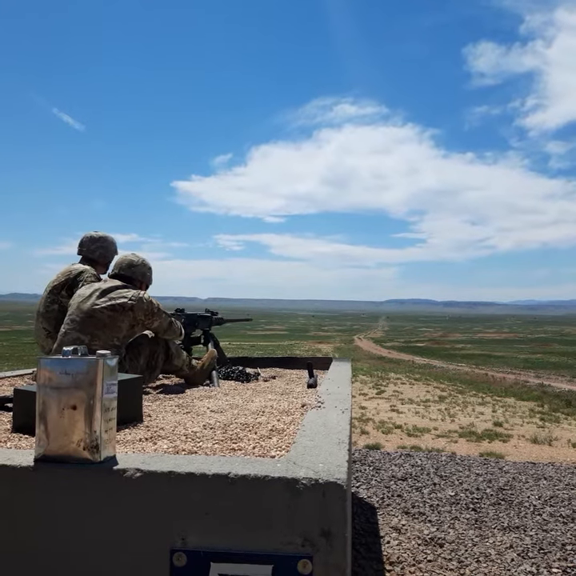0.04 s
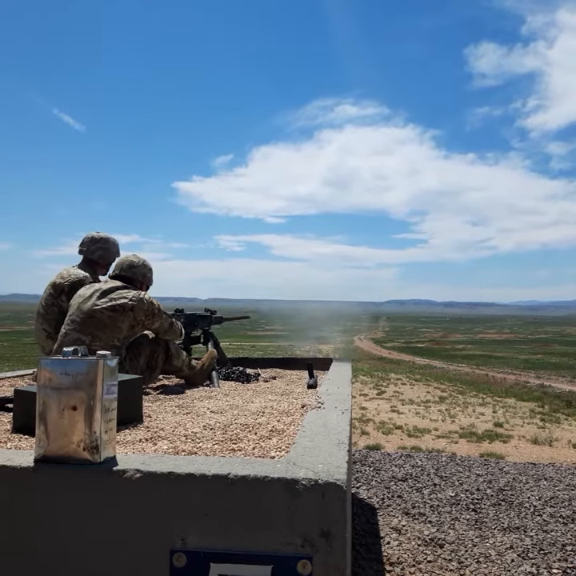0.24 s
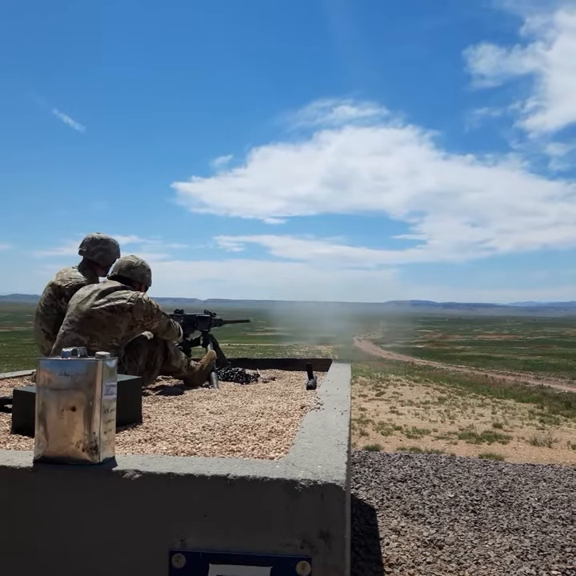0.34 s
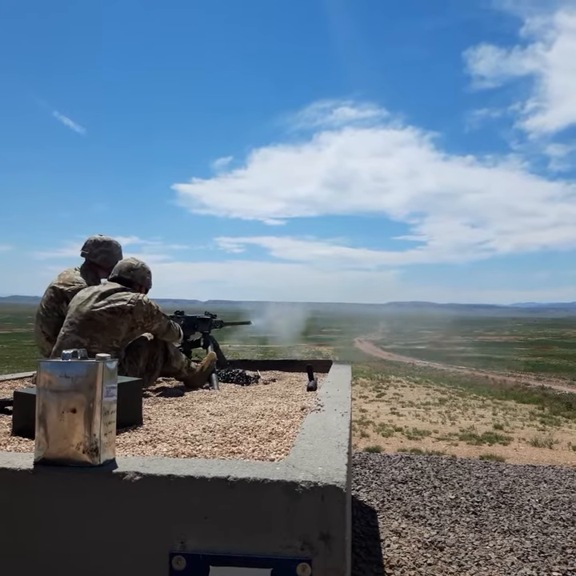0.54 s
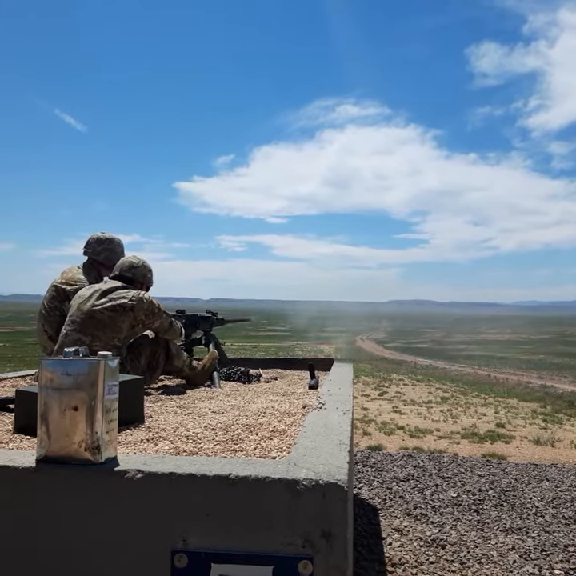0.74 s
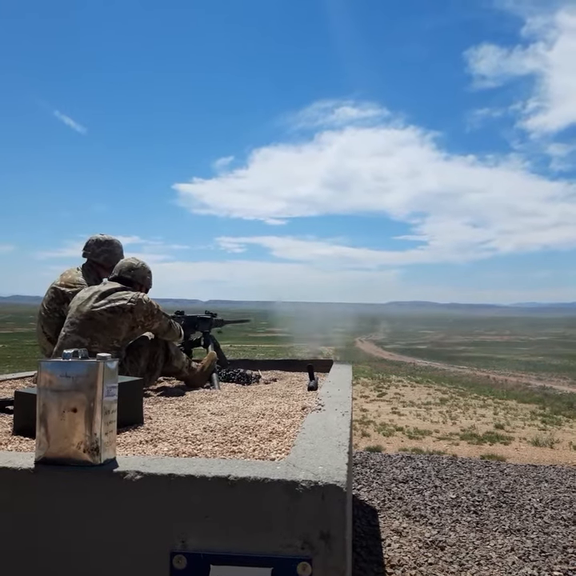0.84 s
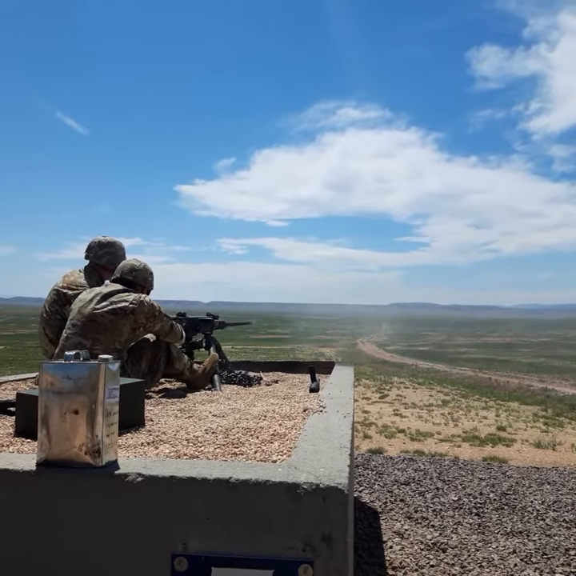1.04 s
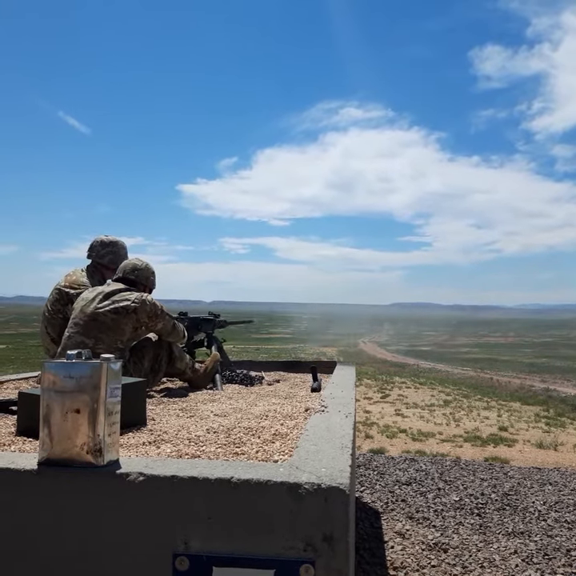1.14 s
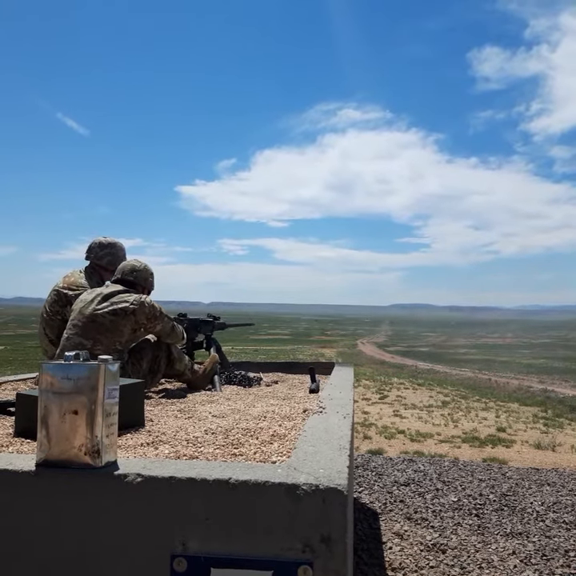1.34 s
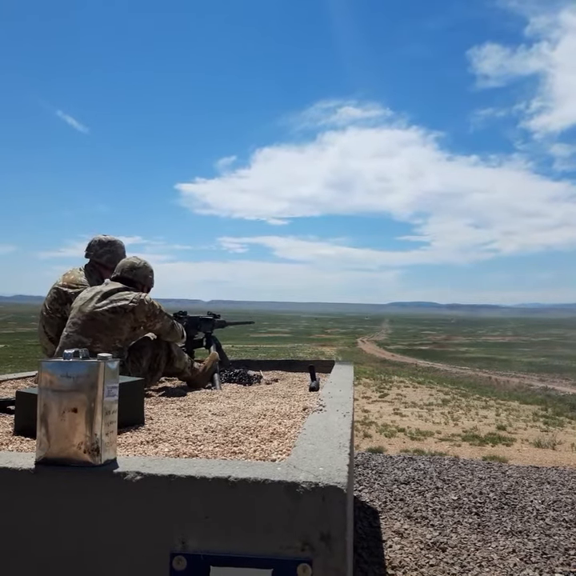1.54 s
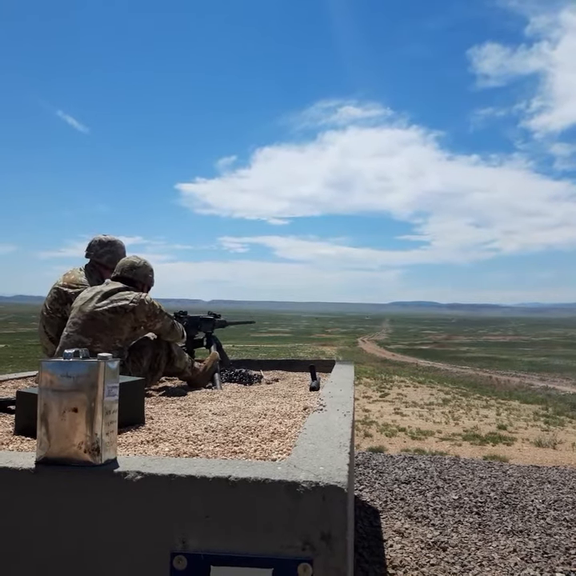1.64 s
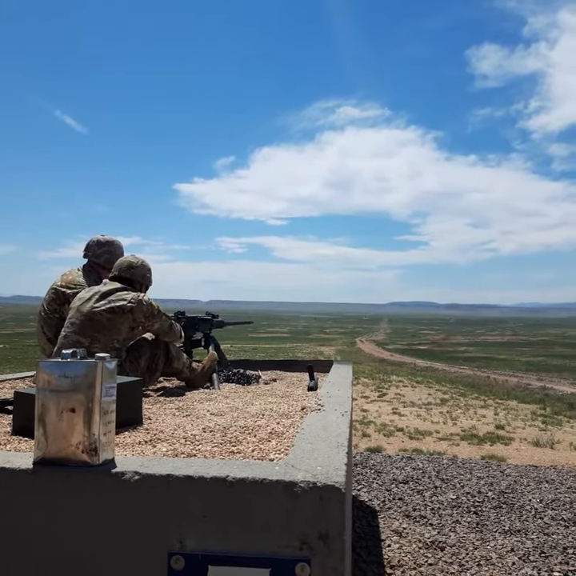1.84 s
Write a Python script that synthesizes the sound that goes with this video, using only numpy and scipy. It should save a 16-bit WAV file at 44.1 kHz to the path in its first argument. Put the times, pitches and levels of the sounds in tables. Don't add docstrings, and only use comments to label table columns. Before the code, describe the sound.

Heavy machine-gun burst, very close and overloading the microphone. From 0 to 0.2 seconds, only a faint low rumble and small thumps from an earlier burst. Eight harsh, crackling blasts run from 0.2 to 1.1 seconds, about eight per second, slowing slightly, with dense thumping, cracking echoes between. Afterwards echoes roll away into fading rumble and hiss, with faint brass tinkles on gravel and quiet open air.

```python
import sys
import numpy as np
from scipy import signal
from scipy.fft import rfft, irfft
from scipy.io import wavfile
from scipy.ndimage import map_coordinates

SR = 44100
rng = np.random.default_rng(int(sys.argv[2]) if len(sys.argv) > 2 else 0)


def master(y):
    cut = np.clip(np.atleast_2d(y).T, -1, 1)
    pcm = np.round(cut * 32767)
    wavfile.write(sys.argv[1], SR, pcm.astype(np.int16))


def boost_factor(decibels):
    exponent = np.asarray(decibels, float) / 20
    return 10 ** exponent


N = 83790
T = np.arange(N) / SR

# t/s, level/dB
SHOTS = [(.2053, -1), (.3241, 0), (.44, -.5), (.5643, 0), (.6895, -1), (.8256, -1), (.9589, -2),
         (1.0919, -2)]
# t/s, level/dB
EARLIER_THUMPS = [(.006, -45), (0.048, -40), (0.072, -54), (.089, -38.5), (0.108, -30), (0.131, -48)]
# f/Hz, level/dB per Hz
AIR = [(18, -45.5), (30, -11.5), (221, 6), (345, -1), (512, -24.5), (1670, -5.5), (2350, -18.5),
       (2680, -18.5), (16000, -39)]
# f/Hz, level/dB per Hz
BLAST = [(350, -11.5), (600, -0.5), (1510, -8), (2670, -5.5), (4640, -4), (7210, -6), (9640, -6.5),
         (15000, -17.5), (16300, -15)]
# f/Hz, t60/s
BLAST_T60 = [(300, 0.18), (1300, 0.36), (3500, 0.41), (7000, 0.28), (13000, 0.19)]
# f/Hz, width/Hz, level/dB
MIC_RINGS = [(2410, 170, 4), (3900, 200, -1.5), (4700, 640, -6.5), (9870, 2700, -12)]
# f/Hz, level/dB per Hz
HISS = [(500, 1.5), (1000, -19), (1600, -13), (2600, -11.5), (4500, -16.5), (7000, -39.5), (9000, -26),
        (16000, -44)]
NEAR_DELAYS = [.0441, .0585, .0862, .0908, .0972, .13, .135, .1405, .1838]
# thump level/dB, f/Hz, cycles to fall 30 dB, crack level/dB, left leads/ms
NEAR_WALLS = [(4, 351.2, 6.5, -30, 0.2), (-9, 470, 5.3, -18.5, 0.061), (4, 406, 4.1, -3, 0.38),
              (-6.5, 355, 3.26, -12.5, 0.04), (0.5, 331, 4.8, -11, -0.34), (-41.5, 810, 4.3, -10, .1),
              (-8.5, 330, 7.6, -17.5, 0.17), (-10, 500, 6.7, -27, 0.21), (-0.5, 451, 2.9, -13, -0.27)]
# delay t/s, thump level/dB, f/Hz, crack level/dB
FAR_WALLS = [(0.171, -8.5, 300, -64), (0.212, -15, 295.2, -73), (0.242, -12.5, 282.5, -33),
             (0.321, -19.5, 300, -34), (0.364, -52, 282.5, -31.5), (0.375, -22.5, 200, -76.5),
             (.403, -21.5, 800, -28.5), (.548, -21, 260, -38.5), (0.606, -33, 257.4, -71),
             (.664, -41, 240, -62), (0.776, -42, 216.3, -88.5)]
INVERTED = [2, 3, 6, 8, 14, 16]
# f/Hz, level/dB per Hz
CRACK = [(500, -3.5), (1200, -4.5), (2400, -1), (4500, 1), (8000, 3.5), (10000, 2), (16000, -24.5)]
# f/Hz, level/dB, t60/s
CASE_MODES = [(5750, -2, .4), (6360, 2, .15), (6500, -2, .3), (7280, -6, .35), (7750, -8, .3),
              (8150, -8, .3), (8860, -6, .45), (10620, -6, .35), (11000, -6, .3), (12400, -6, .4),
              (13760, -8, .35), (14520, -10, .3), (15000, -4, .3)]
# t/s after its shot, level/dB
BOUNCES = [
    (0.201, -50.5),
    (.263, -56.5),
    (.3, -60),
    (.405, -63),
    (.43, -60),
    (.53, -70.5),
]

SHARED, SHARED_LAG_S = 0.4, 0.000441
THUMP_SAG, THUMP_RISE_S, TROUGH_BIAS = 0.32, 0.0004, 0.049
EARLIER_DB, EARLIER_T60_S, EARLIER_CYCLES = -51, 4.9, 7.3
AIR_DB = -59.5
BLAST_DB, BLAST_HOLD_S, HOLD_SAG_DB = -7.5, 0.017, 4.5
BOLT_LEAD_S, BOLT_DB = 0.0055, -11
PATCHY_DB, PATCH_S = 2.5, 0.007
CLUMP_DB, CLUMP_S = 1.5, 0.002
ROLL_START_S, ROLL_PER_S, ROLL_WIDE = 0.014, 1500, 0.5
ROLL_DB, ROLL_T60_S = -23, 0.45
LATE_DB, LATE_T60_S = -19, 0.84
HISS_DB, HISS_T60_S, HISS_DELAY_S = -24.5, 0.93, 0.04
CRACK_T60_S, SHOT_SPREAD_DB = 0.045, 1.0
DULL_HZ, DULL_DB_PER_S = 3300, 86
CASE_DETUNE, CASE_SPREAD_DB, CASE_MAX_T60_S = 0.005, 4.0, 0.45
DUCK_DB, DUCK_S = 8, 0.014
LIMIT_CEILING, MIC_LOW_HZ, MIC_TOP_HZ = 1.6, 93, 16700


def rms_one(x):
    return x / np.sqrt(np.mean(x ** 2) + 1e-20)


def at_hz(points, hz):
    table = np.array(points)
    return np.interp(np.log(hz + 1), np.log(table[:, 0]), table[:, 1])


def coloured(spectrum):
    hz = np.fft.rfftfreq(N, 1 / SR)
    db = at_hz(spectrum, hz)
    for centre, width, peak_db in MIC_RINGS:
        db = db + peak_db / (1 + (2 * (hz - centre) / width) ** 2)
    left, right, common = rfft(rng.standard_normal((3, N)))
    lead = np.exp(1j * np.pi * hz * SHARED_LAG_S * np.array([[1], [-1]]))
    both = np.array([left, right]) + SHARED * common * lead
    return rfft(rms_one(irfft(both * boost_factor(db), N))), hz


def wander(span_s):
    return rms_one(map_coordinates(rng.standard_normal(2000), [T / max(span_s, 0.001)], order=2))


def dying(times, levels_db, t60):
    age = T - np.reshape(times, (-1, 1))
    db = np.reshape(levels_db, (-1, 1)) - 60 * np.abs(age) / t60
    return np.sqrt(np.sum((age >= 0) * boost_factor(2 * db), axis=0))


def thump(age, hz, cycles):
    after = np.maximum(age, 0)
    turns = hz * after
    phase = turns * (1 - THUMP_SAG) + THUMP_SAG * 1.5 * (1 - np.exp(-turns / 1.2))
    wave = np.sin(2 * np.pi * phase) - TROUGH_BIAS
    return wave * (1 - np.exp(-after / THUMP_RISE_S)) * boost_factor(-30 * turns / cycles)


def add(out, s, wave):
    i = int(s * SR)
    out[:, i:i + wave.shape[1]] += wave[:, :max(N - i, 0)]


def scatter():
    clicks = (rng.random((3, N)) < ROLL_PER_S / SR) * rng.standard_normal((3, N))
    age = np.arange(int(0.057 * SR)) / SR
    reply = thump(age, 310, 5.0) + 0.9 * thump(age, 480, 7.0)
    parts = signal.fftconvolve(clicks, reply[None], axes=1)[:, :N]
    stereo = parts[0] + ROLL_WIDE * parts[1:]
    return rms_one(signal.sosfilt(signal.butter(2, 130, "high", fs=SR, output="sos"), stereo))


def earlier_burst():
    out = scatter() * dying([0], [EARLIER_DB], EARLIER_T60_S)
    age = np.arange(int(0.05 * SR)) / SR
    for s, db in EARLIER_THUMPS:
        add(out, s, -boost_factor(db) * thump(age, 220, EARLIER_CYCLES) * np.ones((2, 1)))
    return out


def open_air():
    return boost_factor(AIR_DB) * irfft(coloured(AIR)[0], N)


def blast():
    spectrum, hz = coloured(BLAST)
    age = T - np.array(SHOTS)[:, :1]
    shot_db = np.array(SHOTS)[:, 1:]
    lead = np.where(age > -BOLT_LEAD_S, BOLT_DB + 6 * age / BOLT_LEAD_S, -200)
    held = np.clip(age / BLAST_HOLD_S, 0, 1)
    released = np.maximum(age - BLAST_HOLD_S, 0)
    centres = np.geomspace(400, 15000, num=14)
    out = 0
    for centre in centres:
        t60 = at_hz(BLAST_T60, centre)
        share = at_hz(np.transpose([centres, centres == centre]), hz)
        shape = -HOLD_SAG_DB * 0.092 / t60 * held - 60 * released / t60
        power = np.sum(boost_factor(2 * (shot_db + np.where(age < 0, lead, shape))), axis=0)
        patches = boost_factor(PATCHY_DB * wander(PATCH_S))
        out = out + irfft(spectrum * share, N) * np.sqrt(power) * patches
    return boost_factor(BLAST_DB + CLUMP_DB * wander(CLUMP_S)) * out


def roll():
    quick = dying([ROLL_START_S], [ROLL_DB], ROLL_T60_S)
    slow = dying([ROLL_START_S], [LATE_DB], LATE_T60_S)
    answer = scatter() * (quick + slow)
    out = np.zeros((2, N))
    for s, _ in SHOTS:
        add(out, s, answer)
    times = np.array(SHOTS)[:, 0]
    hiss = irfft(coloured(HISS)[0], N)
    return out + hiss * dying(times + HISS_DELAY_S, HISS_DB + 0 * times, HISS_T60_S)


def echoes():
    out = np.zeros((2, N))
    age = np.arange(int(0.06 * SR)) / SR - 0.001
    sides = np.array([[1], [-1]])
    walls = [(s, *row) for s, row in zip(NEAR_DELAYS, NEAR_WALLS)]
    walls += [(s, db, hz, 4.0, crack_db, 0.1) for s, db, hz, crack_db in FAR_WALLS]
    for s, _ in SHOTS:
        chance = rng.standard_normal((len(walls), 3))
        for k, (delay, db, hz, cycles, _, lead_ms) in enumerate(walls):
            wave = thump(age + sides * lead_ms / 2000, hz * (1 + 0.02 * chance[k, 0]), cycles)
            sign = -1 if k in INVERTED else 1
            add(out, s + delay + age[0], sign * wave * boost_factor(db + SHOT_SPREAD_DB * chance[k, 1:, None]))
    cracks = [(s + wall[0], wall[4], wall[0]) for s, _ in SHOTS for wall in walls]
    times, db, delay = np.transpose(cracks)
    spectrum, hz = coloured(CRACK)
    low = 1 / (1 + (hz / DULL_HZ) ** 6)
    out += irfft(spectrum * low, N) * dying(times, db, CRACK_T60_S)
    treble = irfft(spectrum * (1 - low), N)
    return out + treble * dying(times, db - DULL_DB_PER_S * delay, CRACK_T60_S * 0.8)


def cases():
    out = np.zeros((2, N))
    age = np.arange(int(0.3 * SR)) / SR
    hz, level_db, t60 = np.repeat(CASE_MODES, 2, axis=0).T[..., None]
    fade = boost_factor(level_db - 60 * age / np.minimum(t60, CASE_MAX_T60_S)) * (1 - age / age[-1])
    for s, _ in SHOTS:
        tuned_hz = hz * (1 + CASE_DETUNE * rng.standard_normal(hz.shape))
        rings = fade * np.sin(2 * np.pi * tuned_hz * age)
        for delay, db in BOUNCES:
            touch = boost_factor(db + CASE_SPREAD_DB * rng.standard_normal((2, len(hz))))
            add(out, s + delay, touch @ rings)
    return out


def scene():
    age = T - np.array(SHOTS)[:, :1]
    duck = boost_factor(-DUCK_DB * np.sum((age > 0) * np.exp(-np.abs(age) / DUCK_S), axis=0))
    return blast() + duck * (earlier_burst() + open_air() + roll() + echoes() + cases())


def roll_off(x):
    return signal.sosfilt(signal.butter(12, 16450, fs=SR, output="sos"), x)


def record(dry):
    rounded = LIMIT_CEILING * np.tanh(dry / LIMIT_CEILING)
    cut = signal.sosfilt(signal.cheby2(10, 60, MIC_TOP_HZ, fs=SR, output="sos"), rounded)
    cut = signal.sosfilt(signal.butter(1, MIC_LOW_HZ, "high", fs=SR, output="sos"), cut)
    return roll_off(np.clip(cut, -1, 1))


dry = scene()
out = record(dry)
master(out)
```